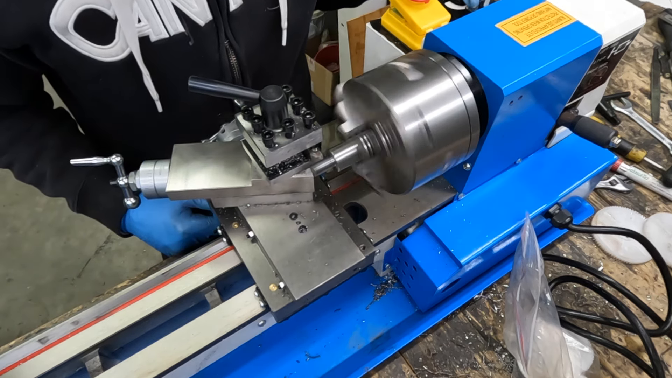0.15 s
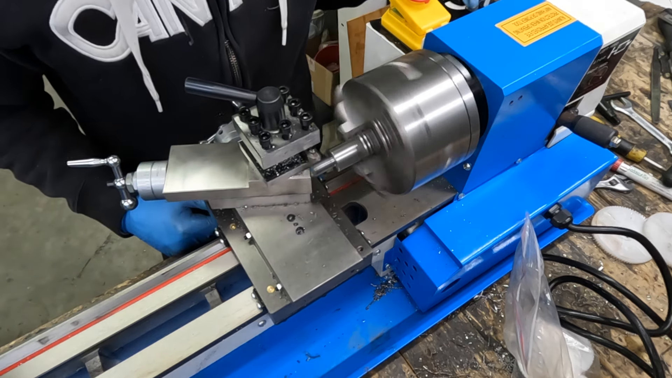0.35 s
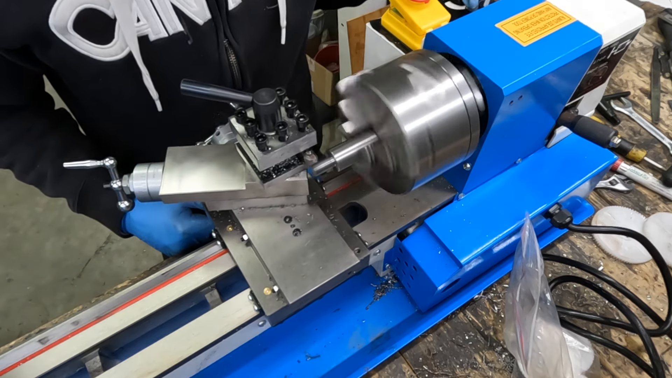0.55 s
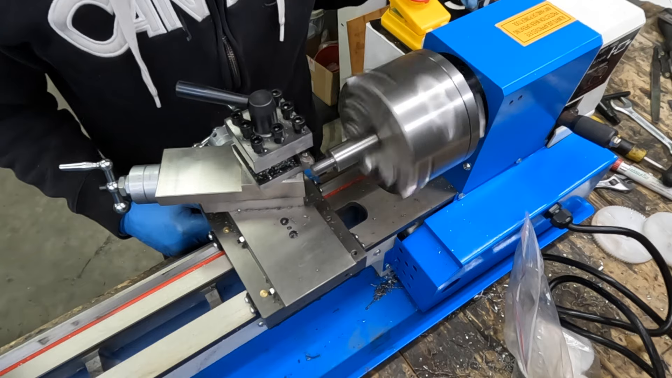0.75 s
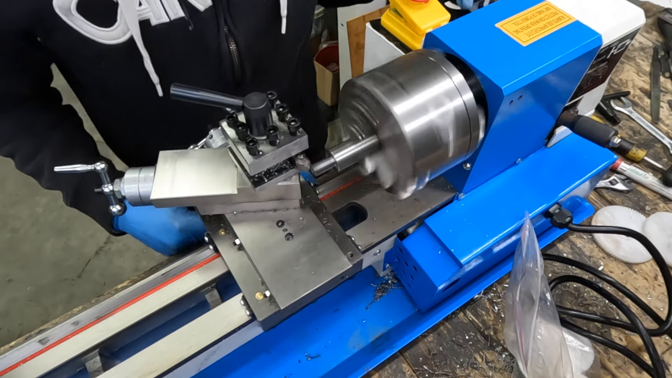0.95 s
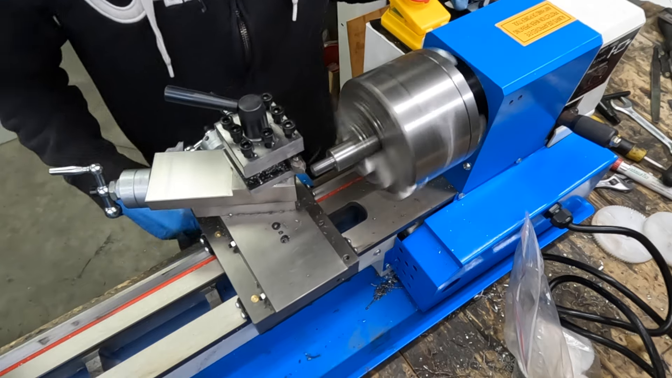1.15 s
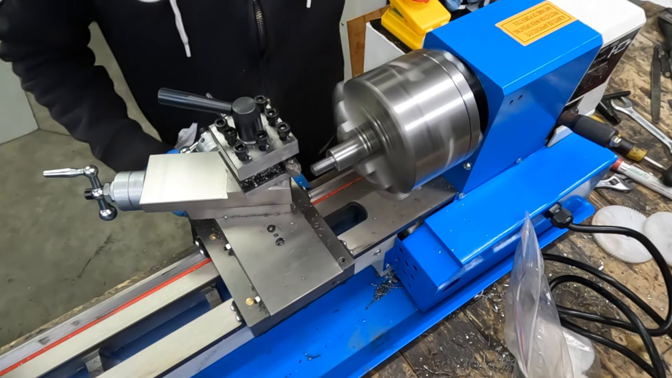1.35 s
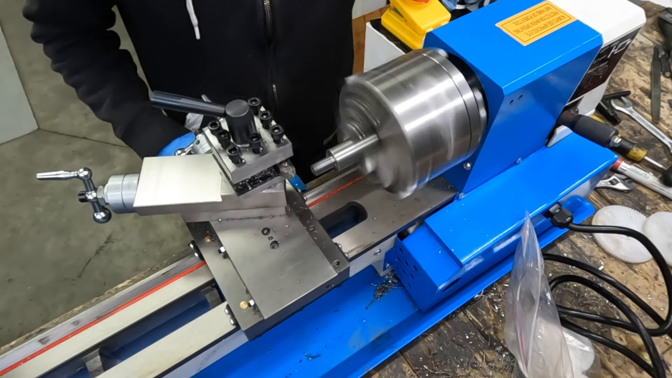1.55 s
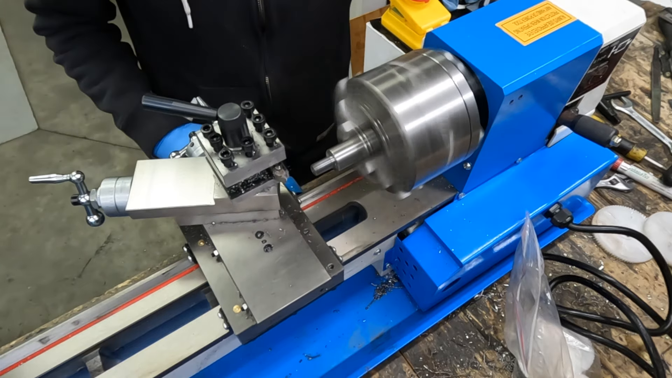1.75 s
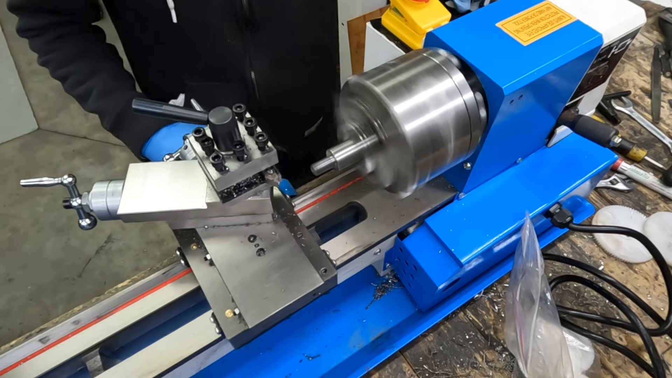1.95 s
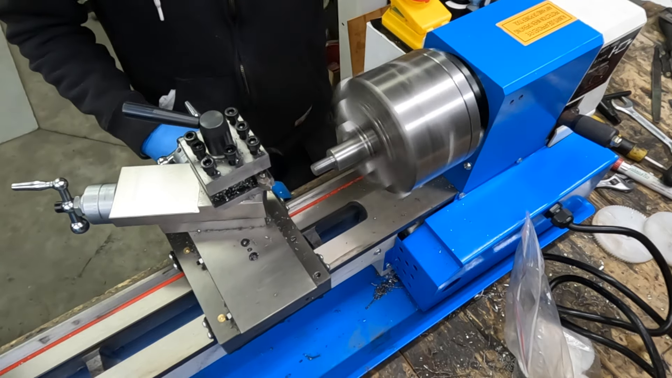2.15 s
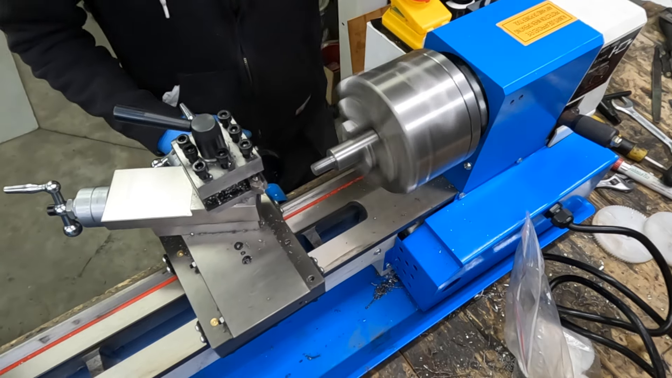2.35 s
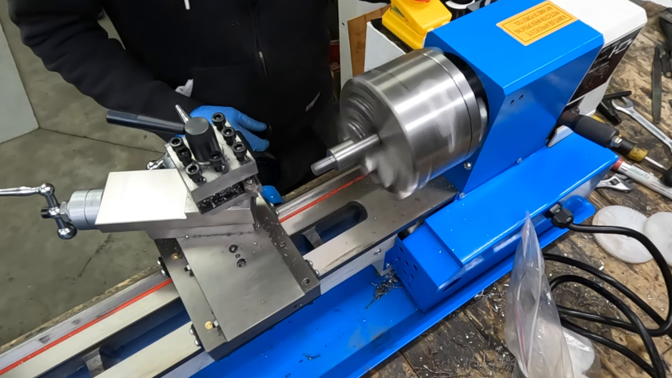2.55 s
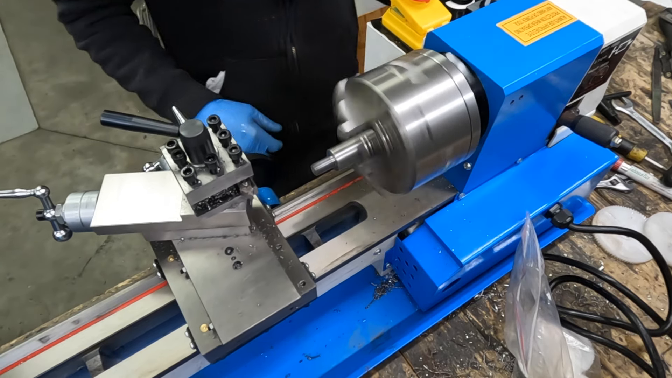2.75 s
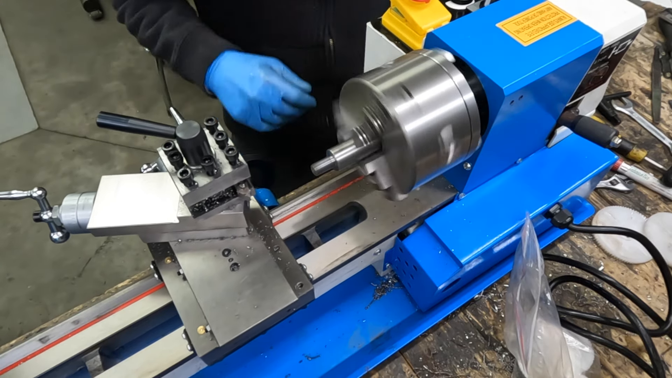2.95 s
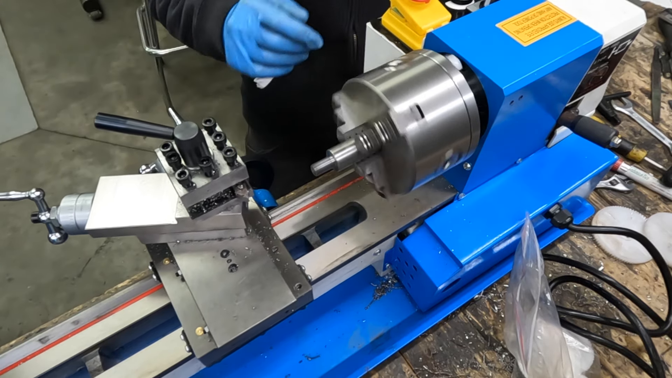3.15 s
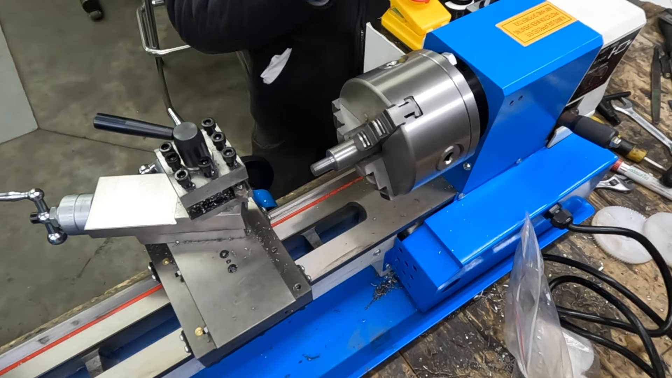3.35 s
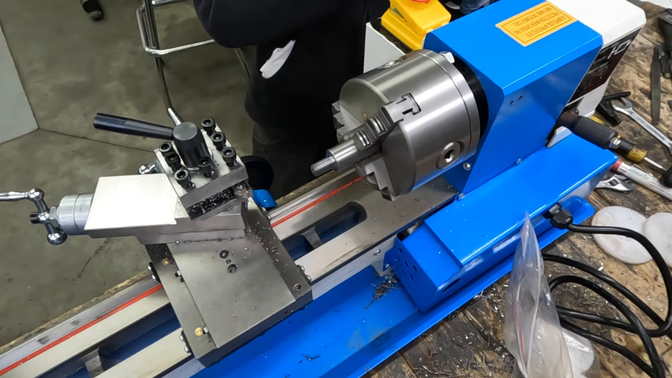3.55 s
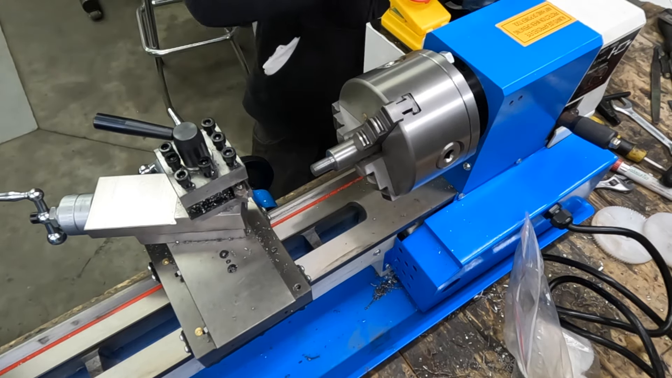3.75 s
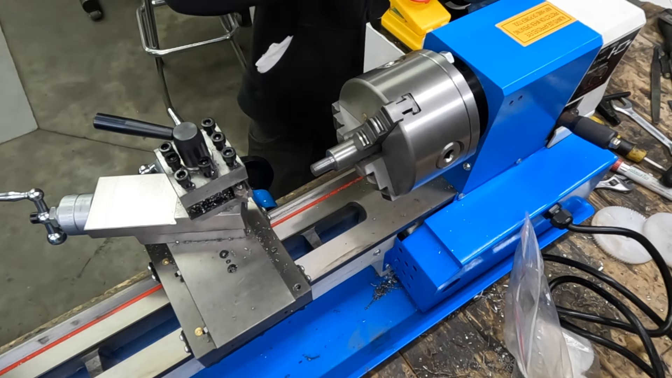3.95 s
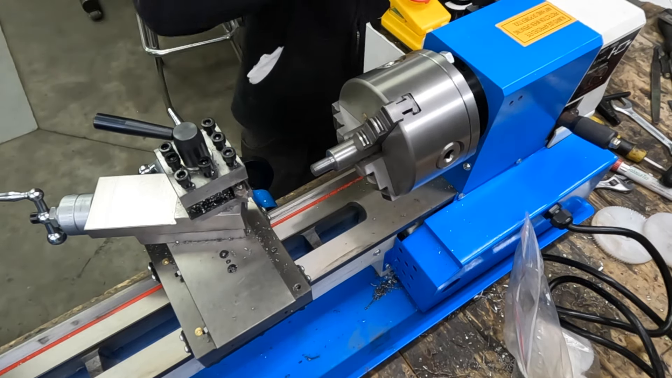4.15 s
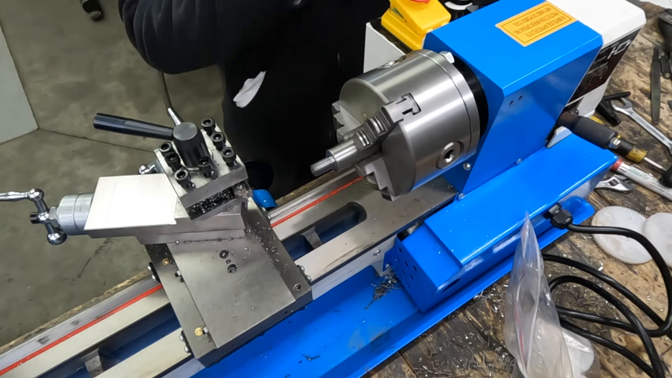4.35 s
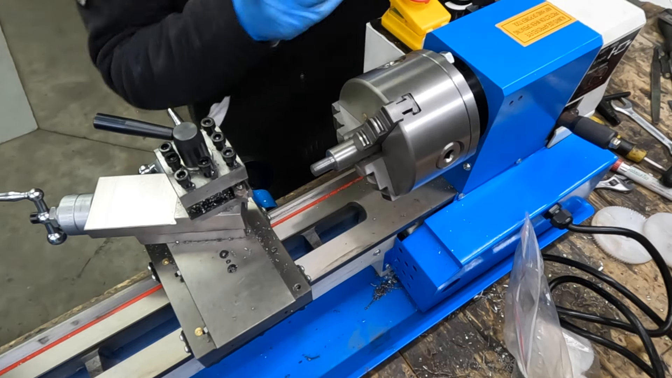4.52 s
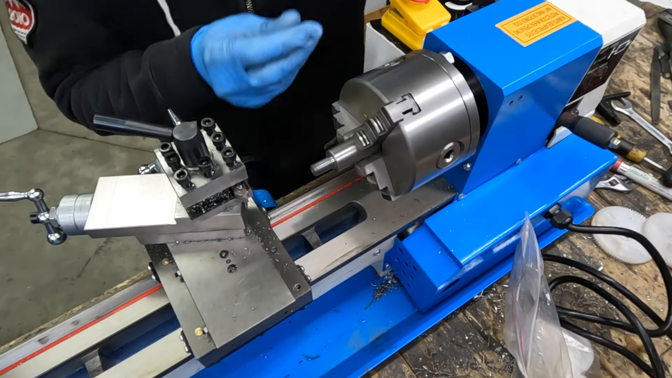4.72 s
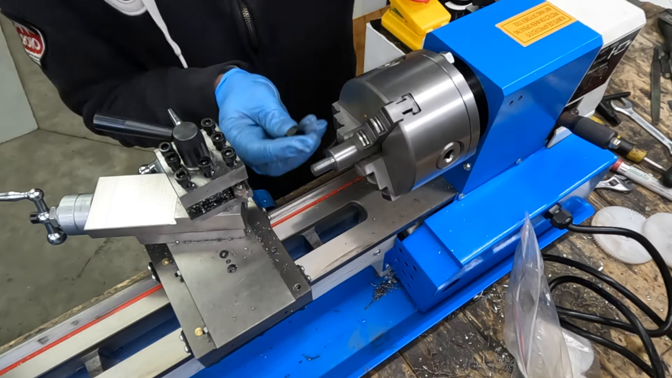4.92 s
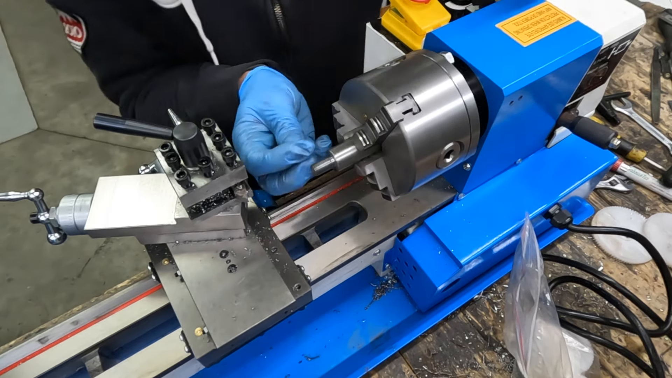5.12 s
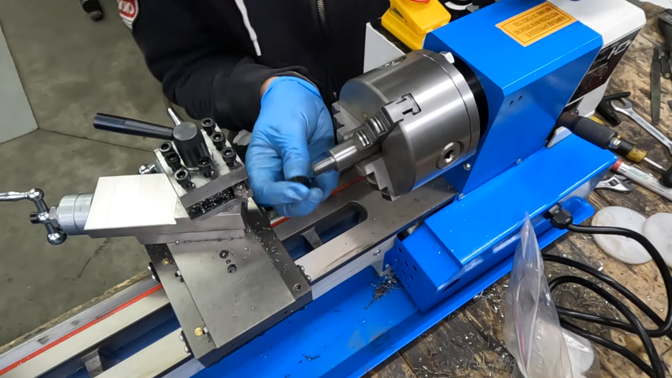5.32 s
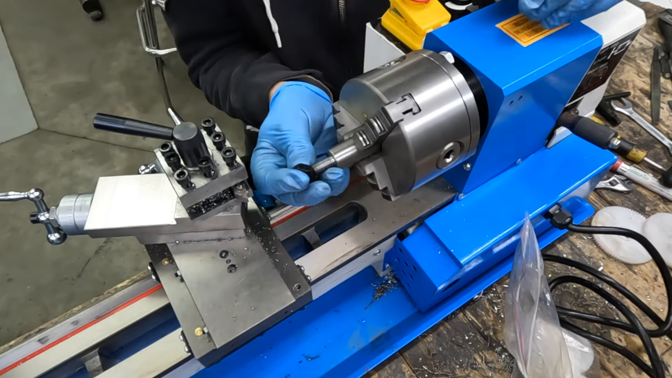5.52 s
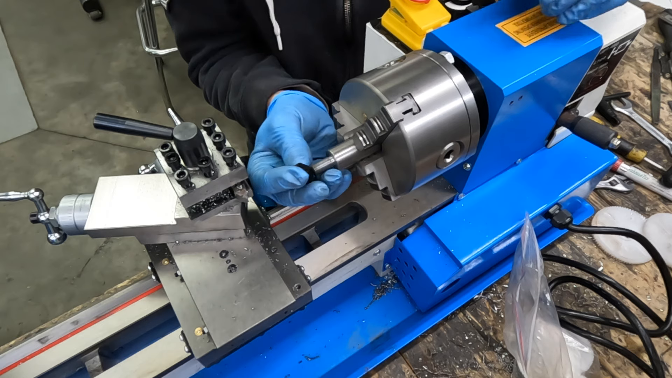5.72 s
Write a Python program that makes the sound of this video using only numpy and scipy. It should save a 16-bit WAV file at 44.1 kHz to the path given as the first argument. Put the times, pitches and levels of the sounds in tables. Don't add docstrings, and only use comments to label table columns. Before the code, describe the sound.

Close up in a workshop, a small lathe runs up for two seconds: mains hum, rising gear whine, dense rattle and hissy flicks. The hum cuts off and the gears coast down, breaking into slower knocks until they stop. Two hard lever clacks ring a metal box, then sleeves and gloves rustle with tiny metal ticks over a faint floor.

```python
import sys
import numpy as np
from scipy import signal
from scipy.fft import rfft, irfft, next_fast_len
from scipy.io import wavfile
from scipy.ndimage import uniform_filter1d

SR = 44100
rng = np.random.default_rng(int(sys.argv[2]) if len(sys.argv) > 2 else 0)


def transcribe(signal):
    frames = np.atleast_2d(signal).T
    limited = np.clip(frames, -1, 1)
    pcm = np.round(limited * 32767).astype(np.int16)
    wavfile.write(sys.argv[1], SR, pcm)


def voltage_ratio(decibels):
    exponent = np.asarray(decibels, float) / 20
    return 10 ** exponent


N = 259308
TIME = np.arange(N) / SR
TEETH, SPINDLE = 25, .48
SWITCH_OFF_S = 2.36

# time_s, turns_per_s
SPEED = [(0, 11.5), (.5, 20), (1.15, 30.2), (1.68, 40.3), (2.04, 48), (2.12, 46.3), (2.33, 46.2),
         (2.43, 39.7), (2.5, 37), (2.59, 32.3), (2.64, 30), (2.7, 28.6), (2.74, 26.8), (3.2, 9), (3.4, 3.2),
         (3.5, 1.4), (3.64, .1)]
# time_s, hum_db, shaft_beat_db
POWER = [
    (0, -22, 1),
    (.3, -22, 0.5),
    (.6, -22.5, -1),
    (1.2, -22, -8),
    (1.8, -24.5, -9.5),
    (2.15, -25, -10),
    (2.27, -28.5, -11.5),
    (2.31, -64.5, -3),
    (2.4, -94.5, -7),
]
# centre_hz, width_hz, level_db
CASING = [(850, 40, -7), (960.5, 58, 2), (1162.3, 20, 7.5), (1325, 6.5, 2.5), (1582, 49, 3.5),
          (1879, 32, 5.5), (2123, 76, -8)]


def curves(table):
    s, *columns = np.transpose(table)
    return [np.interp(TIME, s, column) for column in columns]


def response(points, hz):
    f, db = np.transpose(points)
    return np.interp(np.log(hz), np.log(f), db)


def colour(x, points, peaks=(), causal=True):
    size = 2 * next_fast_len(N // 2 + 4096)
    hz = np.maximum(np.arange(size // 2 + 1) * SR / size, 1)
    gain = voltage_ratio(response(points, hz))
    gain = gain + sum(voltage_ratio(db) / (1 + (2 * (hz - centre) / width) ** 2) for centre, width, db in peaks)
    if causal:
        ceps = irfft(np.log(gain), size)
        ceps[1:size // 2] *= 2
        ceps[size // 2 + 1:] = 0
        gain = np.exp(rfft(ceps))
    y = irfft(rfft(x, size) * gain, size)[:N]
    return y / np.std(y)


def band(x, lo_hz, hi_hz, order=2):
    return signal.sosfilt(signal.butter(order, [lo_hz, hi_hz], "band", fs=SR, output="sos"), x)


def walk(rate):
    k = int(SR / rate)
    held = np.repeat(rng.standard_normal(N // k + 1), k)
    return 1.22 * uniform_filter1d(uniform_filter1d(held, k), k)[:N]


def grit(share, spread_db):
    sizes = voltage_ratio(spread_db * np.minimum(rng.exponential(size=N), 4)) * (rng.random(N) < share)
    return rng.standard_normal(N) * (1 + sizes)


def swells(times, rises, falls, levels_db, rest_db):
    s, rise, fall, db = (np.reshape(c, (-1, 1)) for c in (times, rises, falls, levels_db))
    t = TIME[::32]
    away = np.maximum((s - t) / rise, (t - s) / fall)
    power = np.sum(voltage_ratio(db - 20 * away) ** 2, axis=0) + voltage_ratio(rest_db) ** 2
    return np.interp(TIME, t, np.sqrt(power))


def strikes(times, levels_db, modes, crack_db, crack_s, rise_s, detune=0.033):
    t, out = TIME[:SR // 6], np.zeros(N + SR)
    for s, peak_db in zip(times, levels_db):
        y = voltage_ratio(crack_db) * rng.standard_normal(len(t)) * np.exp(-t / crack_s)
        for hz, db, t60 in modes:
            for chance in rng.standard_normal((2, 3)):
                ring = np.sin(2 * np.pi * hz * (1 + detune * chance[0]) * t + 3 * chance[1])
                y = y + voltage_ratio(db + 3.0 * chance[2]) * ring * np.exp(-np.log(1000) * t / t60)
        y = y * (1 - np.exp(-t / rise_s))
        start = int(s * SR)
        out[start:start + len(t)] += voltage_ratio(peak_db) * y / np.abs(y).max()
    return out[:N]


def driven(hz, free_db, free_power, load_db, load_power):
    speed = hz / 46
    load = voltage_ratio(load_db + curves(POWER)[0]) * speed ** load_power
    return np.hypot(voltage_ratio(free_db) * speed ** free_power, load)


def floor():
    # freq_hz, level_db
    floor_colour = [(60, -6.5), (150, 10.5), (300, -0.5), (480, -1), (800, -11), (1200, -1.5),
                    (2500, -13.5), (6000, -16.5), (8400, -14), (10000, -31.5), (13500, -29)]
    return voltage_ratio(-69.5) * colour(rng.standard_normal(N), floor_colour)


def idle():
    # freq_hz, peak_s, peak_db, fall_s, rest_db
    tones = [
        (116.4, 2.3, -31.5, 0.75, -82.5),
        (349, 1.9, -72.5, 2.113, -79),
        (494, 2.3, -68.5, 2.1, -76),
        (628, 3.4, -51.5, 0.24, -84),
        (441, 3.3, -51.5, .45, -84),
        (8330, 2.3, -95, 2.1, -89),
    ]
    out = 0
    for hz, s, db, fall, rest_db in tones:
        gain = swells(s, 1.5, fall, db, rest_db) * voltage_ratio(1.8 * walk(9.6))
        out = out + gain * np.cos(2 * np.pi * hz * TIME + 0.15 * walk(2.3))
    return 1.3 * (TIME > 2.25) * out


def bench(turn, hz):
    # freq_hz, level_db
    answer = [(6, -62.5), (18, -50.5), (22.5, -35.5), (30, -36.5), (38, -49), (43, -38), (46.5, -29),
              (77, -63.5), (92, -33)]
    # time_s, deep_db, upper_db
    thumps = [
        (3.3, -54.5, -54),
        (3.55, -51, -54.5),
        (3.88, -45, -44),
        (4.04, -41.5, -40),
        (4.25, -47.5, -62),
        (4.44, -56, -63.5),
        (4.84, -56.5, -86.5),
        (5.07, -50.5, -50.5),
        (5.23, -51, -76),
        (5.62, -59, -67),
    ]
    coast_db = -7 * uniform_filter1d(1. * (TIME > SWITCH_OFF_S), SR // 10)
    shake = 0
    for multiple, db in zip((SPINDLE, 1, 2), (5, -2, -15)):
        gain = voltage_ratio(db + coast_db + response(answer, multiple * hz) + 1.5 * walk(6))
        shake = shake + gain * np.cos(multiple * turn) * np.minimum(hz / 12, 1)
    s, deep_db, upper_db = np.transpose(thumps)
    rise_s, fall_s = .09, 0.18
    deep = colour(rng.standard_normal(N), [(12, -31.0), (22, 4.5), (32, 4.5), (50, -5.0), (80, -17.5), (200, -61.5)])
    upper = colour(rng.standard_normal(N), [(40, -31.5), (70, 0.0), (110, 5.5), (160, -3.5), (250, -36.0)])
    deep = deep * np.hypot(driven(hz, -44, 0.7, -44.5, 0.2), swells(s, rise_s, fall_s, deep_db, -58.5))
    upper = upper * np.hypot(driven(hz, -27, 3, -27, 1.5), swells(s, rise_s, fall_s, upper_db, -87))
    return 1.3 * shake + deep + voltage_ratio(-6.0) * upper


def cloth():
    # peak_s, rise_s, fall_s, swish_db, dull_rub_over_swish_db
    rustles = [(3.674, 0.078, 0.13, -65, -9), (3.845, 0.018, 0.18, -46.5, -3.5),
               (3.9, 0.082, .19, -53.5, 7), (4.003, .015, 0.12, -49.5, -5), (4.068, .12, 0.137, -53.5, 6.5),
               (4.18, 0.29, 0.11, -59.5, -3), (4.5, 0.027, .08, -72, 10.5), (4.55, 0.069, .12, -67, 2),
               (4.688, 0.012, .2, -59, -8), (4.8, 0.16, .22, -66, -7.5), (5.042, 0.014, 0.1, -64, 9.5),
               (5.095, 0.054, .06, -63.5, 11), (5.148, 0.19, .09, -64, -2), (5.33, .015, .03, -63, -20),
               (5.367, .025, .03, -57, -21), (5.478, 0.023, .4, -64, 11), (5.669, 0.16, 0.2, -49.5, 7.5)]
    # freq_hz, level_db
    rub_colour = [(53, -53.5), (90, -26.5), (156, -9.5), (296, -17), (366, -0.5), (400, -5), (514, -8),
                  (926, -5.5), (1800, -14), (2340, -43.5), (3960, -120)]
    swish_colour = [(590, -34.5), (1000, -7.5), (1200, -5.5), (1400, -6), (1660, -9), (2490, -5.5),
                    (3440, -8), (7770, -27), (9140, -33), (12200, -35.5), (13400, -46)]
    still_db = -90
    s, rise, fall, db, dull_db = np.transpose(rustles)
    crumple = voltage_ratio(1.2 * walk(40)) * (TIME > 3.5)
    out = swells(s, rise, fall, db + dull_db, still_db) * colour(grit(0.016, 2.3), rub_colour)
    over = (1.4 + 0.24 * dull_db, 0, -4.5 - 0.078 * dull_db)
    for over_db, lo, hi in zip(over, (1100, 2400, 5500), (2400, 5500, 15000)):
        part = band(colour(grit(0.024, 0.76), swish_colour), lo, hi, order=3)
        out = out + swells(s, rise, fall, db + over_db, still_db) * part / np.std(part)
    return crumple * out


def taps():
    # time_s, level_db, centre_hz
    ticks = [(0.226, -27, 3390), (0.588, -16.5, 3410), (3.19, -30, 4300), (3.245, -33, 3300),
             (3.388, -33, 1150), (3.39, -37, 1810), (3.76, -52, 3200), (4.43, -46, 300), (4.455, -52, 520),
             (4.475, -52, 900), (4.488, -55, 1690), (4.505, -56, 2500), (4.526, -55, 3250),
             (4.685, -48.5, 3240), (4.905, -58, 3010), (4.955, -63, 5300), (5.037, -54, 900),
             (5.088, -50, 1000), (5.15, -54.5, 1440), (5.327, -58, 3320), (5.362, -51.5, 2000),
             (5.366, -48.5, 3300), (5.473, -51, 886), (5.585, -36, 996)]
    out = 0
    for s, db, hz in ticks:
        tick = strikes([s], [db + 6.5], [(hz, -8, .05)], 0, .012, .003)
        out = out + band(tick, .75 * hz, 1.35 * hz, order=4)
    return out


def lever():
    # time_s, box_db, plate_db, clatter_db
    blows = [
        (3.624, -72.5, -57, -71),
        (3.662, -49.5, -49.5, -58),
        (3.689, -60, -53, -58.5),
        (3.852, -21, -23.5, -30.5),
        (3.856, -22.5, -28.5, -30.5),
        (3.865, -19, -29.5, -43),
        (4.01, -26.5, -26, -30),
        (4.013, -22.5, -24, -25.5),
        (4.026, -28, -28.5, -35.5),
    ]
    # freq_hz, level_db, t60_s
    body = [(423, 4, 0.071), (493, -1, 0.11), (590, -5, 0.072), (900, -8, 0.028), (980, -4, 0.08),
            (1304, -4, 0.085), (1507, -9, 0.1), (1761, -7.5, .05)]
    clatter = [(2366, -6.5, 0.088), (2900, -5, 0.083), (3320, -1, 0.036), (3560, 6, 0.035), (4200, 0, 0.05),
               (5696, -10.5, 0.11), (6600, 4, 0.04), (7690, -9.5, 0.047)]
    s, box_db, plate_db, ring_db = np.transpose(blows)
    box = strikes(s, box_db + 7, body[:3], 12, .009, .0015)
    plate = strikes(s, plate_db + 12, body[3:], 14, .008, .0015)
    ring = strikes(s, ring_db + 10, clatter, 14, .006, .002, .03)
    high = band(ring, 2265, 7300) + voltage_ratio(-10) * band(ring, 11000, 14500)
    return band(box, 220, 900) + band(plate, 700, 2600) + high


def panels():
    # time_s, level_db, freq_hz, t60_s
    rings = [(.585, -21, 1520, .12), (.61, -22, 1880, .06), (.785, -24, 1885, .15), (.855, -21, 1870, .07),
             (1.03, -25, 1430, .2), (1.15, -22, 1540, .07), (1.77, -28, 2180, .1), (2.46, -22, 860, .3),
             (2.52, -22, 853, .25), (2.585, -26, 960, .15), (2.645, -30, 3300, .06),
             (2.755, -25, 1870, .15), (2.805, -27, 1160, .2), (2.835, -27, 1085, .12),
             (2.845, -28, 1160, .15), (2.87, -26, 512, .25), (2.905, -29, 850, .12), (2.95, -29, 498, .12),
             (2.95, -33, 430, .2), (3.005, -30, 800, .12), (3.02, -36, 358, .2), (3.095, -29, 860, .1),
             (3.1, -33, 1870, .1), (3.11, -33, 572, .2), (3.12, -38, 431, .2), (3.18, -43, 2360, .07),
             (3.185, -37, 1450, .06), (3.24, -38, 1300, .06), (3.19, -35, 890, .12), (3.24, -34, 2050, .1),
             (3.245, -39, 1830, .1), (3.28, -41, 1650, .06), (3.388, -40, 1870, .06),
             (3.388, -44, 600, .06), (3.9, -43, 410, .3), (3.945, -44, 440, .3), (3.865, -38, 1270, .15),
             (3.87, -46, 1820, .12), (4.011, -33, 990, .09), (4.06, -47, 960, .2), (4.05, -47, 436, .25),
             (4.05, -48, 3650, .2), (4.05, -53, 2900, .25)]
    return sum(strikes([s], [db], [(hz, 0, t60)], -60, .005, .008, .006) for s, db, hz, t60 in rings)


def lumps():
    # peak_s, rise_s, fall_s, level_db
    bunches = [(2.655, .02, .05, -36), (2.77, .02, .05, -36), (2.85, .02, .06, -36), (2.92, .02, .05, -38),
               (2.96, .02, .04, -40), (3.035, .03, .05, -39), (3.105, .015, .05, -37),
               (3.195, .025, .05, -36), (3.25, .03, .04, -35), (3.293, .015, .07, -43),
               (3.393, .004, .04, -50), (3.46, .1, .2, -58)]
    # freq_hz, level_db
    lump_colour = [(500, -25), (900, -3), (1500, -2), (2000, 0), (2700, -6), (3400, -8), (4400, -15),
                   (6500, -30)]
    noise = colour(grit(.02, 3.0), lump_colour + [(12000, -50)], CASING + [(4300, 150, -8)])
    return swells(*np.transpose(bunches), -120) * noise


def flicks():
    # time_s, peak_db
    puffs = [(0.0388, -34), (0.1805, -32.5), (0.2279, -36.5), (0.2914, -31), (0.3074, -28), (0.4005, -34),
             (0.4294, -36), (0.4744, -33.5), (0.5861, -26), (0.6114, -31.5), (0.6594, -30.5),
             (0.6794, -30.5), (0.7327, -32.5), (0.7834, -32.5), (0.8254, -28), (0.8909, -30.5),
             (0.9243, -28.5), (0.9737, -26), (1.0011, -27), (1.0834, -27), (1.1124, -27.5), (1.1754, -29),
             (1.2204, -27.5), (1.2584, -26.5), (1.3194, -28), (1.3583, -25), (1.4207, -26), (1.481, -26.5),
             (1.5594, -26.5), (1.5994, -25), (1.6464, -26), (1.6881, -26), (1.7444, -26.5), (1.7744, -26.5),
             (1.8094, -25), (1.8492, -25.5), (1.9334, -27.5), (2.0344, -24.5), (2.0794, -25), (2.1261, -24),
             (2.1674, -22.5), (2.2149, -23), (2.2573, -23.5), (2.3037, -22.5), (2.3524, -25),
             (2.5202, -34.5), (2.6494, -35.5), (2.7294, -38), (2.8594, -41), (3.0294, -45.5),
             (3.1018, -45.5), (3.1857, -38.5), (3.2354, -39), (3.2894, -50.5)]
    # freq_hz, level_db
    puff_colour = [(1800, -30), (3000, -3), (5000, 1.5), (7400, -5), (8600, -14.5), (10200, -18),
                   (12200, -16.5), (13400, -25)]
    s, db = np.transpose(puffs)
    noise = colour(grit(0.026, 2.4), puff_colour, [(1850, 60, 10), (3300, 200, -1.5), (5000, 200, -2)])
    return swells(s + .008, .02, .04, db - 7.5, -120) * noise


def cover(turn, hz):
    gate = np.exp(2.5 * (np.cos(turn - 1.9) - 1))
    ring = band(grit(0.013, 3.0), 1830, 1910) + voltage_ratio(-13) * band(grit(0.0091, 3.0), 1550, 1620)
    return driven(hz, -39.5, 3, -9.5, 1.26) * voltage_ratio(2.5 * walk(5)) * gate * ring / np.std(gate * ring)


def knocks():
    # time_s, burst_db, cover_ring_db
    blows = [(0.019, -39.5, -31), (0.113, -23.5, -19), (0.1792, -26, -28), (0.2299, -31.5, -27),
             (0.3005, -22, -42.5), (0.4768, -22.5, -31.5), (0.5862, -24, -22), (0.6563, -21, -18.5),
             (0.6964, -28.5, -21.5), (0.7403, -26.5, -18), (0.7924, -27.5, -23.5), (0.837, -20.5, -24),
             (0.9282, -21.5, -24), (1.222, -21, -33.5), (1.2645, -23.5, -25), (1.3565, -16.5, -30),
             (1.5438, -27, -24.5), (1.7675, -23.5, -21), (1.814, -19.5, -27), (1.9452, -23.5, -18.5),
             (2.2565, -17.5, -20.5), (2.646, -23, -25), (2.772, -34.5, -36), (2.91, -30, -33),
             (3.0299, -31.5, -35), (3.1018, -32, -30.5), (3.1825, -27, -36), (3.236, -23, -36)]
    # time_s, level_db
    further = [
        (0.365, -41),
        (3.0287, -40.5),
        (3.1852, -38),
        (3.25, -33),
        (3.29, -36),
        (3.388, -48),
    ]
    s, burst_db, cover_db = np.transpose(blows)
    burst = strikes(s, burst_db + 6, [(3400, -14, .04)], 0, .013, .012)
    bright = band(burst, 1400, 4100, order=4) + voltage_ratio(-15.5) * band(burst, 2700, 6700, order=4)
    ring = strikes(s, cover_db + 4.5, [(1874, -1, 0.037), (1586, -14, 0.045)], -38.5, .006, 0.0039, .012)
    thud_s, thud_db = np.transpose([(t, -40.5) for t in s] + further)
    thud = strikes(thud_s, thud_db, [(205.0, -6, 0.16), (1000, -8.5, 0.046)], -34.5, .006, 0.0033)
    return bright + band(ring, 900, 3000) + thud


def tooth_whine(turn, hz, mesh):
    # freq_hz, level_db
    whine_out = [(50, -75), (330, -53), (520, -41), (680, -48), (760, -31), (900, -27), (1000, -27.5),
                 (1070, -35), (1170, -27.5)]
    octave_out = [(100, -75), (750, -50), (1340, -46), (1430, -38), (1520, -34), (1700, -33.5), (1850, -34),
                  (2000, -36), (2300, -54)]
    coast_db = uniform_filter1d(1. * (TIME > SWITCH_OFF_S), SR // 20)
    whine_db = response(whine_out, TEETH * hz) + coast_db
    octave_db = response(octave_out, 2 * TEETH * hz) + 2.5 * coast_db
    wobble = 1 + .5 * np.cos(turn) + .35 * np.cos(SPINDLE * turn)
    whine = voltage_ratio(whine_db + 1.3 * walk(11)) * np.cos(mesh)
    octave = voltage_ratio(octave_db + 1.5 * walk(18)) * np.cos(2 * mesh)
    return 1.5 * wobble * (whine + octave)


def gear_noise(turn, hz, mesh):
    # freq_hz, level_db
    growl_colour = [(60, -25.5), (90, -4.5), (118, -11.5), (150, -18), (200, -16.5), (290, -15), (370, -4),
                    (430, -9), (520, 1), (600, -5), (700, -12), (900, -0.5), (1500, -51)]
    rattle_colour = [(500, -30), (750, -8), (1000, -0.5), (1400, -8), (1900, -13.5), (2300, -15),
                     (3000, -46)]
    hiss_colour = [(1060, -13), (1800, -0.5), (1890, -2), (2020, -9), (2300, -8.5), (2520, -6), (3000, -14),
                   (3240, -12.5), (4640, -17.5), (5970, -20.5), (7060, -23.5), (8350, -35.5), (11600, -39),
                   (13400, -60.5)]
    stall = 9.1
    late_coast = TIME > 2.7
    throb_db = 1.0 * np.cos(turn + 1) + 1.0 * np.cos(SPINDLE * turn) + 0.77 * walk(15)
    throb_db = throb_db * np.interp(hz, (8, 30), (1.8, 1.3))
    teeth = np.exp(0.23 * np.cos(mesh))

    growl = colour(grit(0.0019, 4.6), growl_colour)
    growl = driven(hz, -35, 0.41, -8.5, -0.3) * voltage_ratio(2.0 + 0.31 * walk(24)) * growl
    growl = 1.11 * growl * np.tanh(1.3 * hz / stall)

    rattle = colour(teeth * grit(.01, 3.0), rattle_colour, CASING)
    rattle = driven(hz, -26.5, 0.9545, -7, 0.04) * voltage_ratio(1 + 1.2 * throb_db) * rattle
    rattle = voltage_ratio(-2.5 * late_coast) * rattle * np.tanh(hz / stall) ** 1.1

    hiss = band(colour(teeth * grit(.03, 2.5), hiss_colour), 1500, 5500, order=3)
    hiss = driven(hz, -30.5, 1.68, -12.5, 0.63) * voltage_ratio(3.5 + 0.97 * throb_db) * hiss / np.std(hiss)

    draught = colour(grit(0.035, 2.5), hiss_colour)
    wind = band(draught, 5500, 8500, order=3)
    wind = wind + driven(hz, -8.5, 0.1, 24, 0.26) * band(draught, 8500, 11600, order=3)
    wind = wind + driven(hz, -4.5, -0.5, 21.5, 2) * band(draught, 11600, 16000, order=3)
    wind = driven(hz, -38, 2.5, -16, 1.08) * voltage_ratio(1.3 * throb_db - 2 * late_coast) * wind / np.std(wind)
    return (growl + rattle + hiss + wind) * (TIME < SPEED[-1][0])


def gears(turn, hz):
    chatter = np.interp(TIME, (2.3, 2.45, 2.68, 2.85), (.15, .35, .4, 2))
    mesh = TEETH * turn + chatter * walk(30)
    return tooth_whine(turn, hz, mesh) + gear_noise(turn, hz, mesh)


def hum(turn):
    # multiple, level_db, sidebands minus_turn_db, plus_turn_db, plus_spindle_db, plus_two_turns_db, left_minus_right_db
    lines = [
        (1, 1, -8.5, -9.5, -19.5, -27.5, -2),
        (2, -10.5, -16, -14.5, -13, -29.5, -12),
        (3, -2.5, -6, -3, -7, -24, -10.5),
        (4, -1, -19.5, -5.5, -4, -14.5, -1),
        (5, -11.5, 0.5, -4, -9.5, -13, 2),
    ]
    mains_hz = 120.03
    level_db, beat_db = curves(POWER)
    mid, side = 0, 0
    for k, db, *bands, pan_db in lines:
        line = np.exp(2j * np.pi * (k * mains_hz * TIME + rng.random()))
        beat = 0
        for side_db, turns in zip(bands, (-1, 1, SPINDLE, 2)):
            beat = beat + voltage_ratio(side_db + 2.0 * walk(4)) * np.exp(1j * (turns * turn + 6 * rng.random()))
        line = line * voltage_ratio(db + level_db) * (voltage_ratio(1.1 * walk(6)) + voltage_ratio(beat_db) * beat)
        mid = mid + line.real
        side = side + np.tanh(pan_db / 15.0) * (k < 3) * line.real + (.35 if k < 3 else .08) * line.imag
    return mid, side


def room(x, t60, damp_hz):
    t = TIME[:SR // 2]
    tail = rng.standard_normal(len(t)) * np.exp(-np.log(1000) * t / t60) * np.minimum(t / 0.0062, 1)
    tail = signal.sosfilt(signal.butter(1, damp_hz, fs=SR, output="sos"), tail)
    return signal.fftconvolve(x, tail / np.sqrt(np.sum(tail ** 2)))[:N]


def patchy(side):
    out = signal.sosfiltfilt(signal.butter(6, 4500, fs=SR, output="sos"), side)
    for lo in np.arange(4500, 9000, 750):
        kept = uniform_filter1d(1. * (walk(20) > (lo - 7000) / 3000), 600)
        strip = signal.butter(3, [lo, lo + 750], "band", fs=SR, output="sos")
        out = out + kept * signal.sosfiltfilt(strip, side)
    return out


def stereo_side(air, mid, hum_side, shake):
    # time_s, side_db
    width = [
        (0, 1.5),
        (2.3, 0.5),
        (2.55, -7.5),
        (2.7, -22),
        (4.7, -33),
        (5.2, -10.5),
        (5.88, -9.5),
    ]
    # freq_hz, level_db
    side_colour = [(60, -16.5), (200, -6.5), (360, -25), (650, -10.5), (1200, -15.5), (2200, -11),
                   (4000, -8.5), (7000, -11.5), (9000, 0)]
    lagging = signal.hilbert(air, next_fast_len(N))[:N].imag
    spread = .7 * lagging + .6 * air * walk(150) - 0.12 * air
    spread = colour(spread, side_colour, causal=False) * np.std(air) * voltage_ratio(-11.5)
    spread = np.where(TIME < 3, patchy(spread), spread)
    top = signal.sosfilt(signal.butter(20, 11600, "high", fs=SR, output="sos"), mid * walk(1500))
    return voltage_ratio(curves(width)[0]) * (spread + hum_side - .3 * shake * (TIME < 3)) + voltage_ratio(-2.0) * top


def scene():
    hz = curves(SPEED)[0]
    turn = 2 * np.pi * np.cumsum(hz) / SR
    hum_mid, hum_side = hum(turn)
    blows, click, shake = knocks(), lever(), bench(turn, hz)
    train = gears(turn, hz) + cover(turn, hz) + blows + flicks()
    air = train + cloth() + taps() + idle() + floor() + click + panels() + lumps()
    tails = voltage_ratio(-11.5) * room(train, 0.39, 6000) + voltage_ratio(-16.5) * room(click, 0.44, 6000)
    tails = tails + voltage_ratio(-7) * room(band(blows, 2400, 7000, order=3), 0.63, 5984)
    mid = air + hum_mid + shake + tails
    side = stereo_side(air, mid, hum_side, shake)
    low_pass = signal.ellip(8, .2, 50, 13450, fs=SR, output="sos")
    cut = signal.sosfiltfilt(low_pass, [mid + side, mid - side])
    return cut + voltage_ratio(-10) * band(click, 13700, 15300, order=4)


def top_cut(x):
    return signal.sosfilt(signal.butter(12, 15140, fs=SR, output="sos"), x)


def record(dry):
    return top_cut(dry)


dry = scene()
out = record(dry)
transcribe(out)
```